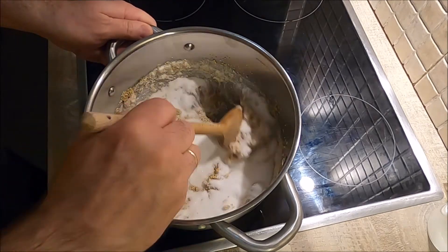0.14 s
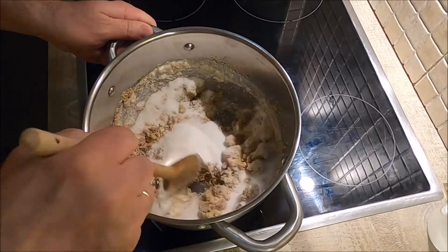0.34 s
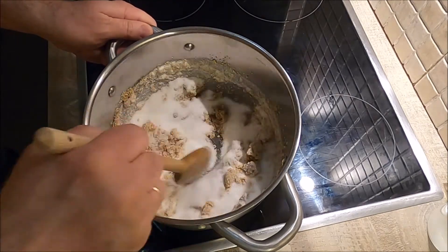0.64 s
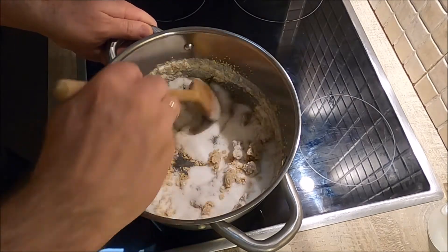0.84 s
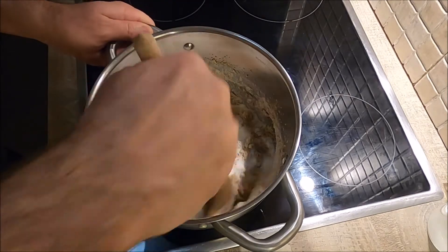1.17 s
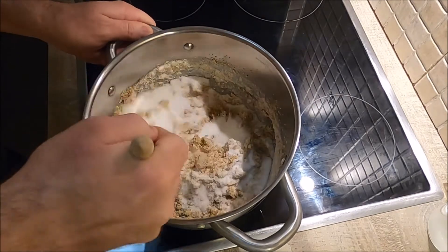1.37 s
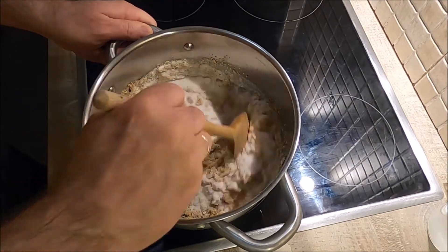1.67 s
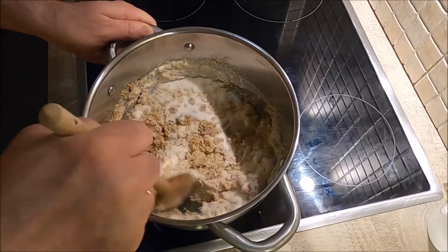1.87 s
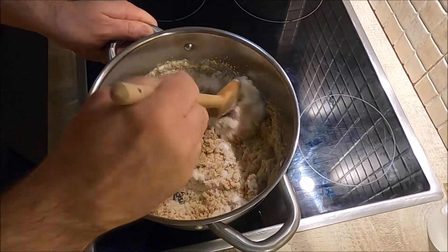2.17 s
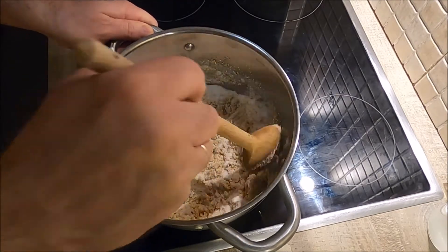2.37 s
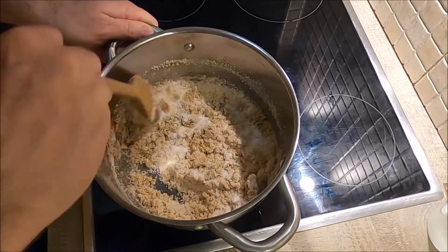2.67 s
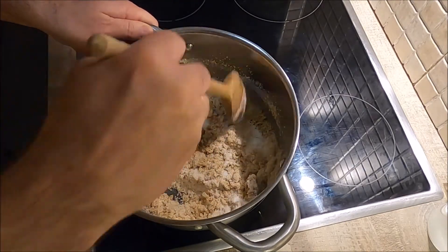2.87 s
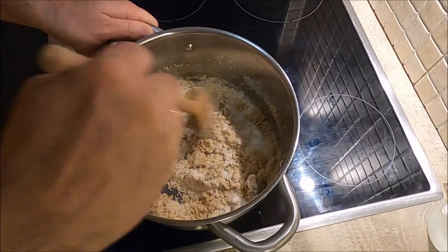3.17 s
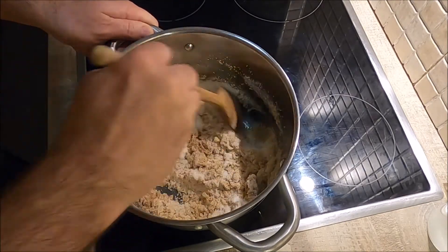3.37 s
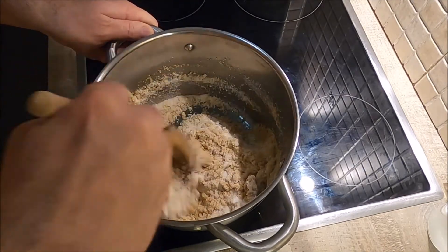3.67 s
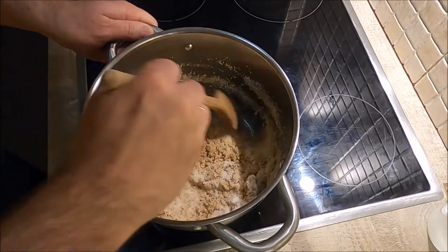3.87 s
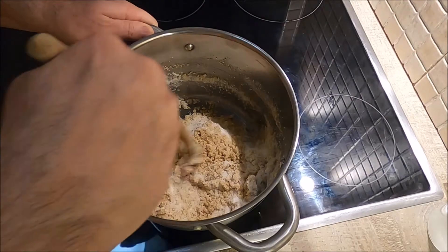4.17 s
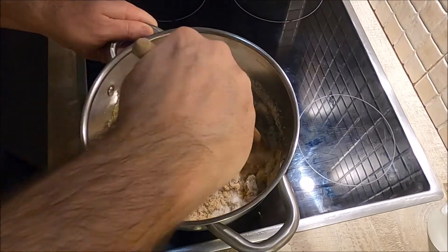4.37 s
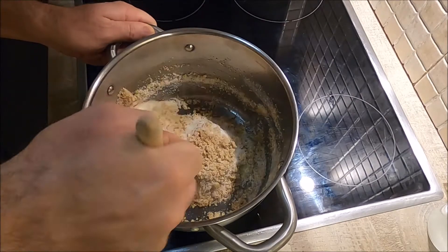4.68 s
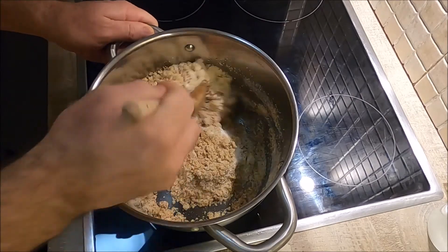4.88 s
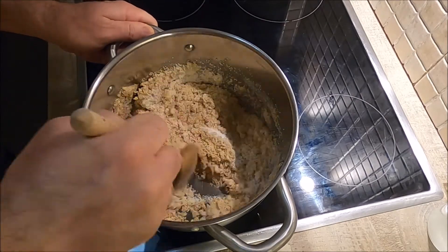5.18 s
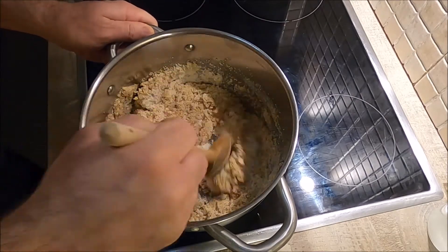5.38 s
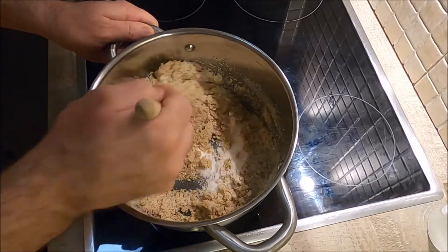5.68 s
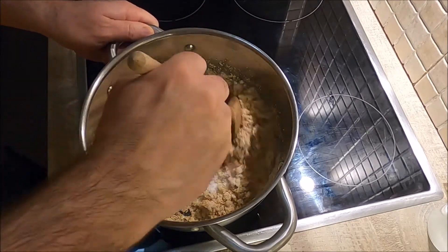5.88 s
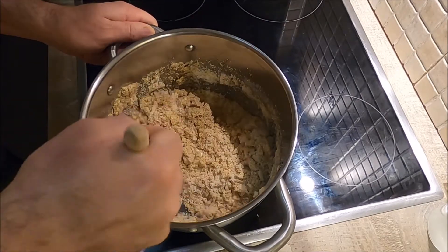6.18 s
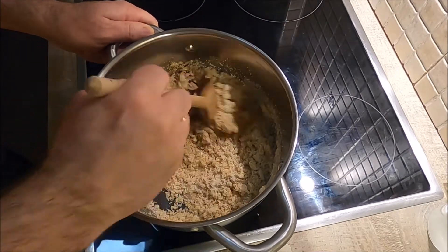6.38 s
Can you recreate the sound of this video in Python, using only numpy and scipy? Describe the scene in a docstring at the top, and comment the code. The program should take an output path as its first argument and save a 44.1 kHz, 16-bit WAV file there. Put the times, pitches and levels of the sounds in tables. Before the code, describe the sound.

Heard from just above a steel pot in a small, quiet kitchen, a wooden spoon stirs dry sugar and crumbs. From 0 to 1 s a grainy rasp with sandy hiss swells and eases over soft low bumps. At 1.0 s a crisp crunch and a double thud start a longer scrape to about 2.1 s, followed by a shorter push. A knock at 2.5 s leads to choppier strokes: bright crunches with short wood-on-steel clunks at 3.05 and 3.4 s, then more at 3.95 and 4.1 s. Around 4.5 s comes a sharp crunch and the deepest thump, the pot rocking on the glass hob. From there to 6.5 s scraping is nearly continuous, gritty and uneven, with lighter taps, small crunches and dull bumps, a last crisp tick near 6.46 s. Metal ringing is brief and damped; reflections are short, the sound leaning slightly left.

```python
"""Sugar grains hiss and rasp in sweeps that swell as the hand bears down and settle after each turn: a wooden
spoon stirs a dry, crumbly mix in a hand-held steel pot on a glass hob in a small kitchen. The scrape is
random clicks and coloured noise; crystals crunch on the steel as short band-passed bursts; the pot thuds and
rocks, its bottom, base and wall ringing as damped modes. Random reflections and a quiet noise floor surround it."""
import sys
import numpy as np
from scipy import signal
from scipy.fft import rfft, irfft, next_fast_len
from scipy.io import wavfile

SR = 44100
rng = np.random.default_rng(int(sys.argv[2]) if len(sys.argv) > 2 else 0)


def transcribe(u):
    """Save the signal u as a 16-bit wav file named by the first command-line argument.

    u: samples, shape (n,) or (channels, n), limited to [-1, 1]; the rate is SR.
    q: integer samples, one column per channel.
    """
    v = np.clip(np.atleast_2d(u).T, -1, 1)
    q = np.round(v * 32767).astype(np.int16)
    wavfile.write(sys.argv[1], SR, q)


N = 287973
TIME = np.arange(N) / SR


def from_db(db):
    """Decibels to gain."""
    return 10 ** (np.asarray(db) / 20)


def rms_one(x):
    """Scale to unit rms."""
    return x / np.sqrt(np.mean(x ** 2) + 1e-20)


def at_hz(points, hz):
    """Interpolate a table on a log-frequency axis."""
    f, value = np.transpose(points)
    return np.interp(np.log(np.maximum(hz, 1)), np.log(f), value)


def band(x, low_hz, high_hz):
    """Causal band-pass."""
    edges_hz = [low_hz, min(high_hz, SR / 2 - 500)]
    return signal.sosfilt(signal.butter(2, edges_hz, "band", fs=SR, output="sos"), x)


def coloured(x, spectrum):
    """Shape a noise by a spectrum; rms 1."""
    size = next_fast_len(N)
    gain = from_db(at_hz(spectrum, np.fft.rfftfreq(size, 1 / SR)))
    return rms_one(irfft(rfft(x, size) * gain, size)[..., :N])


def drift(rate_hz):
    """Slow random curve: normal values of spread 1, rate_hz a second, joined by lines."""
    return np.interp(TIME * rate_hz, np.arange(4000), rng.standard_normal(4000))


def add(track, s, sound):
    """Mix a sound into a track at a time."""
    start = int(np.clip(round(s * SR), 0, N - 1))
    track[start:start + len(sound)] += sound[:N - start]


def ring(push, hz, t60_s):
    """Two-pole resonator: a unit click starts a decaying sine of height 1."""
    r = from_db(-60 / (t60_s * SR))
    w = 2 * np.pi * hz / SR
    return signal.lfilter([0, np.sin(w)], [1, -2 * r * np.cos(w), r * r], push + 1e-18)


def grains(per_s, spread_db, size=N):
    """Random clicks of either sign, with exponentially distributed dB levels capped at 5 spreads."""
    born = rng.random(size) < per_s / SR
    sign = rng.choice([-1, 1], size)
    return born * sign * from_db(spread_db * np.minimum(rng.exponential(1, size), 5))


def struck(modes, times_s, levels_db, scatter_db):
    """Every blow excites each mode with a strength of its own; levels have one row a blow."""
    out = np.zeros(N)
    at = np.clip(np.round(times_s * SR).astype(int), 0, N - 1)
    strengths_db = levels_db + scatter_db * rng.standard_normal((len(at), len(modes)))
    for k, (hz, db, t60_s) in enumerate(modes):
        pushes = np.zeros(N)
        pushes[at] = (-1) ** k * from_db(db + strengths_db[:, k])
        out += ring(pushes, hz, t60_s)
    return out


def favour(hz, spot_hz, db_per_octave):
    """Gain in dB, falling with distance from the pitch that a spot favours."""
    return -db_per_octave * np.abs(np.log2(hz / spot_hz))


# quiet-kitchen noise spectrum: f/Hz, relative level/dB
QUIET_SPECTRUM = [(25, -7), (90, 1), (200, 4), (400, -6), (900, -11.5), (2000, -38), (5000, -31),
                  (9000, -42), (16000, -44.5)]


def quiet_kitchen():
    """Steady noise, mostly independent at the two microphones."""
    shared = rng.standard_normal(N)
    separate = rng.standard_normal((2, N))
    return from_db(-66.5) * coloured(shared + 2.8 * separate, QUIET_SPECTRUM)


KITCHEN_T60_S, KITCHEN_TREBLE_T60_S = 0.28, 0.054
# likeness of reflected sound at the two microphones: f/Hz, likeness/0-1
LIKENESS = [(100, 1), (400, 0.42), (1000, 0.07), (2500, 0.11), (5000, 0.14), (15000, 1)]


def reflections(pot_db, pot_t60_s, room_db):
    """Stereo response: flutter inside the pot and off the hob, then a kitchen tail that loses its treble first."""
    t = TIME[:2 ** 14]
    alike = np.clip(at_hz(LIKENESS, np.fft.rfftfreq(len(t), 1 / SR)), 0, 1)
    mid, side = rfft(rng.standard_normal((2, len(t)))) / np.sqrt(SR)
    pair = irfft(np.sqrt((1 + alike) / 2) * mid + np.sqrt((1 - alike) / 2) * side * [[1], [-1]])
    dull = signal.lfilter(*signal.butter(1, 6000, fs=SR), pair)

    def dying(t60_s):
        """Exponential fall of unit energy."""
        return np.sqrt(2 * np.log(1000) / t60_s) * np.exp(-np.log(1000) * t / t60_s)

    tail = dull * dying(KITCHEN_T60_S) + (pair - dull) * dying(KITCHEN_TREBLE_T60_S)
    onset = np.minimum(t / 0.0016, 1)
    return (from_db(pot_db) * pair * dying(pot_t60_s) + from_db(room_db) * tail) * onset


LEFT_LAG_SAMPLES, TURNS_PER_S = 2, 1.5


def placed(x, left_db, pot_db, pot_t60_s, room_db, count):
    """Sound arrives later and louder at the left; reflections crossfade as the spoon passes count spots a turn."""
    out = np.array([np.pad(x, (LEFT_LAG_SAMPLES, 0))[:N], x])
    spot = TIME * TURNS_PER_S * count
    for k in range(count):
        share = np.interp(spot, np.arange(count), np.arange(count) == k, period=count)
        response = reflections(pot_db, pot_t60_s, room_db)
        out = out + signal.oaconvolve((x * np.sqrt(share))[None], response, axes=1)[:, :N]
    return out * from_db([[left_db / 2], [-left_db / 2]])


ROCKING_HZ = 91.8
# blows that move the pot: t/s, then relative level/dB of rocking, bottom, clap
KNOCKS = [(.021, -47, -45.5, -82), (.184, -38, -48.5, -56), (.359, -52, -57, -73),
          (.619, -41.5, -50.5, -79), (1.009, -40, -35.5, -66), (1.044, -43.5, -35, -67),
          (1.119, -44.5, -41, -80), (1.179, -42, -48, -72), (1.362, -37.5, -40.5, -54),
          (1.612, -41.5, -48, -75), (1.666, -42, -37.5, -53), (2.082, -45, -36.5, -50),
          (2.231, -41, -41, -63), (2.515, -53, -31, -44.5), (2.539, -53, -28.5, -57),
          (2.568, -72, -36.5, -75), (2.675, -80, -50.5, -74), (2.739, -88, -56.5, -78),
          (3.051, -45.5, -24, -48), (3.074, -62, -37, -55.5), (3.099, -67, -37, -62),
          (3.403, -58, -25, -42), (3.447, -46, -33.5, -46), (3.649, -59, -74, -72),
          (3.707, -47.5, -70, -77), (3.951, -37, -33.5, -63), (3.993, -30, -31, -49.5),
          (4.077, -37, -46, -56), (4.458, -43.5, -30.5, -55.5), (4.511, -23.5, -27.5, -42),
          (4.623, -35, -68, -64.5), (4.748, -38, -57, -60), (5.039, -41, -41, -52.5),
          (5.066, -34.5, -40.5, -75), (5.177, -43.5, -39.5, -53), (5.37, -55.5, -74, -82),
          (5.448, -44.5, -73, -83), (5.812, -48.5, -43, -49.5), (5.89, -35, -65, -67),
          (6.057, -50, -52.5, -70), (6.2, -41, -47.5, -55.5), (6.463, -37.5, -43, -59.5)]


def rocking(rise_s, t60_s):
    """Each blow sets the whole pot bouncing on the hob: a decaying low sine with a soft start."""
    out, t = np.zeros(N), TIME[:SR // 2]
    envelope = (1 - np.exp(-t / rise_s)) * np.exp(-np.log(1000) * t / t60_s)
    bounce = envelope * np.sin(2 * np.pi * ROCKING_HZ * t)
    for s, db, _, _ in KNOCKS:
        add(out, s, from_db(db + 14.5) * bounce)
    return out


# modes of the loaded bottom and the hob under it: f/Hz, relative level/dB, t60/s
BOTTOM_MODES = [(122.3, -7, 0.28), (142.9, -3.5, 0.3), (185, 5.5, 0.075), (191, 2, 0.13), (219, -3.5, 0.15),
                (268.6, -6, 0.1), (286.2, -4.5, 0.07)]


def bottom_thuds():
    """Blows ring the loaded bottom and the hob under it."""
    knock_s, _, bottom_db, _ = np.transpose(KNOCKS)
    return band(struck(BOTTOM_MODES, knock_s, bottom_db[:, None] - 0.5, scatter_db=3.5), 76, 600)


# modes of the pot's base clapping on the glass: f/Hz, relative level/dB, t60/s
CLAP_MODES = [(348.7, 4.5, 0.12), (387, 0, 0.052), (426.3, 0.5, 0.14), (468.4, -2, 0.16), (516, -1.5, 0.11),
              (571.6, -2.5, 0.099), (614.3, -4.5, 0.092), (679, -6.5, 0.16), (714, -9.5, 0.12),
              (832, -12, 0.097)]


def base_claps():
    """Blows clap the pot's base on the glass and ring its modes."""
    knock_s, _, _, clap_db = np.transpose(KNOCKS)
    return band(struck(CLAP_MODES, knock_s, clap_db[:, None] + 2.5, scatter_db=3.5), 190, 1700)


SWEEP_ATTACK_S, SETTLE_DB_PER_S = 0.0053, 284


def sweeping(start_s, end_s):
    """Envelope of a sweep: quick start, hold, then the grains settle."""
    attack = np.clip((TIME - start_s) / SWEEP_ATTACK_S, 0, 1)
    return attack * from_db(-SETTLE_DB_PER_S * np.maximum(TIME - end_s, 0))


JUDDER_DB, JUDDER_DB_PER_S = -6.5, 122   # start relative to the KNOCKS rocking level; rate of fall
# the spoon ploughs through the mix: start t/s, end t/s, relative start level/dB, relative end level/dB,
# loose sugar/dB (more hiss, less rasp), relative drag level on the pot/dB
SWEEPS = [(0, 0.707, -53.5, -58.5, 0, -59), (.7, 1, -67, -58.5, 1, -72), (1.04, 2.07, -52, -54, 0, -55.5),
          (2.085, 2.328, -62, -54.5, 3, -54), (2.532, 2.823, -62.5, -57, 4, -72),
          (3.037, 3.224, -56.5, -56.5, -1, -72), (3.44, 3.755, -49, -59, 1.5, -56),
          (3.76, 3.938, -66, -64, -2.5, -68), (3.95, 4.183, -54.5, -52.5, -1, -56),
          (4.466, 5.195, -55, -53, 0.5, -64), (5.22, 5.742, -57, -58, -1, -79),
          (5.766, 6.53, -54, -50.5, 0, -55.5)]


def dragging():
    """Friction slips drive the pot's low modes during sweeps; the pot judders on after every blow."""
    power = sum((sweeping(start_s, end_s) * from_db(drag_db)) ** 2
                for start_s, end_s, _, _, _, drag_db in SWEEPS)
    judder_fall_db = JUDDER_DB_PER_S * TIME[:SR // 2]
    for s, rocking_db, _, _ in KNOCKS:
        add(power, s, from_db(rocking_db + JUDDER_DB - judder_fall_db) ** 2)
    slips = grains(830, spread_db=3.5)
    modes = [(ROCKING_HZ, 11, 0.11)] + BOTTOM_MODES
    hum = sum((-1) ** k * from_db(db) * ring(slips, hz, t60_s) for k, (hz, db, t60_s) in enumerate(modes))
    return np.sqrt(power) * rms_one(hum)


# modes of the hand-damped wall: f/Hz, relative level/dB, t60/s
WALL_MODES = [(598, -4, .1), (760, -3, .13), (992, 0, .15), (1012, -4, .19), (1170, -8, .13),
              (1335, -7, .17), (1497, -4, .18), (1658, -5, .12), (1870, -4, .1), (1990, -5, .1),
              (2085, 0, .17), (2379, -5, .1)]
# bare spoon on the steel wall: t/s, relative level/dB, favoured f/Hz
TAPS = [(1.008, -46.5, 1870), (2.238, -50.5, 1930), (2.515, -41.5, 695), (2.678, -54, 1160),
        (3.051, -35.5, 1043), (3.075, -58, 2000), (3.403, -41.5, 970), (4.076, -44.5, 1500),
        (4.103, -44.5, 1380), (4.458, -47.5, 2110), (5.036, -48.5, 2400), (6.461, -45, 1430)]


def wall_rings():
    """Taps ring the hand-damped wall, most in the modes near the spot's pitch."""
    tap_s, tap_db, spot_hz = np.transpose(TAPS)
    answer_db = favour(np.array(WALL_MODES)[:, 0], spot_hz[:, None], db_per_octave=7.5)
    return struck(WALL_MODES, tap_s, tap_db[:, None] + 0.5 + answer_db, scatter_db=3.2)


def wood_clunks(level_db, fall_s, width):
    """The damped wooden spoon answers each tap with a short, broad clunk around the spot's pitch."""
    out, t = np.zeros(N), TIME[:SR // 8]
    for s, db, hz in TAPS:
        rattle = rng.standard_normal(len(t)) * np.exp(-t / fall_s)
        sound = band(rattle, hz / (1 + width), hz * (1 + width))
        add(out, s, from_db(db + level_db) * sound / np.abs(sound).max())
    return out


# crunch bands: low f/Hz, high f/Hz
CRUNCH_BANDS = [(900, 2200), (2200, 3800), (3800, 6300), (6300, 8600)]
# spoon crushing crystals on steel: t/s, burst fall time/s, level/dB, favoured f/Hz, loss away from it/(dB/octave)
CRUNCHES = [(0.18, .0018, -42, 5600, 5), (0.621, 0.0018, -47, 1900, 5), (1.0058, 0.0025, -26.5, 3900, 6.5),
            (1.2965, 0.00075, -47, 4500, 1), (1.342, 0.006, -45, 7000, 5),
            (1.3815, 0.0039, -45.5, 4970, 3.5), (1.6086, 0.0026, -37, 1700, 12.5),
            (1.668, 0.0023, -39.5, 6500, 11), (2.0798, 0.0059, -36.5, 5130, 6),
            (2.225, 0.0028, -39, 4600, 2.5), (2.237, 0.00097, -40, 1680, 2.5),
            (2.5164, 0.00062, -36, 3200, 2.5), (2.662, .0031, -44, 5460, 7),
            (2.6766, 0.0019, -37.5, 5800, 11.5), (3.049, 0.0019, -23, 5560, 12),
            (3.073, 0.014, -33, 4360, 11), (3.4024, 0.00062, -25.5, 7440, 3),
            (3.9471, 0.003, -27, 5500, 6.5), (3.986, .012, -43, 3500, 0), (4.075, 0.0017, -30, 1800, 5),
            (4.433, 0.0067, -49.5, 8000, 11), (4.4596, 0.003, -25.5, 5250, 20.5),
            (4.512, 0.0044, -39.5, 5460, 3.5), (4.7082, 0.0052, -37.5, 4800, 6.5),
            (5.0365, 0.0042, -34, 7100, 9.5), (5.8086, 0.0018, -39.5, 3480, 7),
            (5.9042, 0.0018, -42, 6000, 14), (6.011, .0014, -48.5, 1400, 15),
            (6.186, .0073, -37, 3300, 8.5), (6.4599, 0.00053, -31.5, 5930, 3)]


def crunches(rise_share, grit_db, grit_s, load_db, load_s, sparkle_db, sparkle_top_db):
    """Crystals creak under load, burst within milliseconds, then grind on; the spot colours each burst."""
    out, lead_s = np.zeros(N), .02
    t = TIME[:SR // 8] - lead_s
    before = t < 0
    times_s, falls_s, peak_db, spot_hz, loss = np.transpose(CRUNCHES)
    levels_db = [peak_db + favour(np.sqrt(low * high), spot_hz, loss) for low, high in CRUNCH_BANDS]
    # the finest splinters can only get so loud
    finest_db = np.minimum(levels_db[-1] + sparkle_db, sparkle_top_db)
    burst = np.exp(-np.abs(t) / (falls_s[:, None] * np.where(before, rise_share, 1)))
    grinding = from_db(np.where(before, load_db, grit_db)) * np.exp(-np.abs(t) / np.where(before, load_s, grit_s))
    for (low, high), band_db in zip(CRUNCH_BANDS + [(8500, 12100)], levels_db + [finest_db]):
        cracks = rng.standard_normal(burst.shape) * (burst + grinding)
        sounds = band(band(cracks, low, high), low * 0.65, high * 1.63)
        for s, db, sound in zip(times_s, band_db, sounds):
            rms = np.sqrt(np.sum(sound ** 2) / (0.0074 * SR))   # energy spread over 7.4 ms
            add(out, s - lead_s, from_db(db) * sound / rms)
    return out


def wandering(x, depth_db, rate_hz):
    """Each third of an octave swells and fades on its own as the heap shifts around the spoon."""
    size = next_fast_len(N)
    spectrum, hz = rfft(x, size), np.fft.rfftfreq(size, 1 / SR)
    out = np.zeros(N)
    centres_hz = np.geomspace(900, 9000, 10)
    for centre_hz in centres_hz:
        weight = np.interp(hz, centres_hz, centres_hz == centre_hz)
        part = irfft(spectrum * weight, size)[:N]
        out += part * from_db(depth_db * drift(rate_hz))
    return out


def crumbs(per_s, t60_s):
    """Larger crumbs snap one by one, each at one of ten pitches; rms 1."""
    pitches_hz = np.geomspace(1200, 8000, 10)
    snaps = [grains(per_s / len(pitches_hz), spread_db=0.8) for _ in pitches_hz]
    return rms_one(sum(ring(clicks, hz, t60_s) for clicks, hz in zip(snaps, pitches_hz)))


TRICKLE_DB = -77.5   # faint flow between sweeps, relative like SWEEPS
# the hand bears down: t/s, half length/s, relative level/dB, favoured f/Hz
PUSHES = [(0.161, .04, -46, 2900), (0.278, .04, -54, 7000), (.385, 0.038, -50.5, 1410),
          (0.533, 0.1, -49.5, 2000), (0.82, 0.039, -46.5, 1600), (0.893, 0.031, -56.5, 2960),
          (1.17, 0.041, -43, 3500), (1.354, .03, -46.5, 4500), (1.593, 0.087, -46.5, 1940),
          (2.194, 0.065, -41.5, 2550), (2.337, .02, -54.5, 4800), (2.609, .03, -45.5, 4400),
          (2.753, 0.033, -51, 3540), (2.817, 0.032, -50.5, 1490), (2.927, 0.019, -64, 8000),
          (3.195, 0.015, -50, 1800), (3.352, 0.14, -54, 1250), (3.497, 0.043, -47.5, 3500),
          (3.815, 0.03, -49.5, 1250), (4.092, .045, -46.5, 2170), (4.705, 0.031, -49, 3830),
          (4.964, .03, -56, 1500), (5.358, 0.028, -49.5, 1790), (5.662, 0.045, -54, 4970),
          (5.825, 0.063, -45, 2470), (5.923, 0.032, -46.5, 2560), (6.176, .045, -41, 2590),
          (6.414, .04, -44, 2300), (6.502, 0.024, -45, 5390)]


def effort_db(hz, sugar_share, sweep_db):
    """Scrape level around hz: sweeps sloping evenly in dB, plus a bell-shaped swell for every push."""
    power = from_db(TRICKLE_DB) ** 2
    for start_s, end_s, start_db, end_db, sugar_db, _ in SWEEPS:
        slope_db = np.interp(TIME, [start_s, end_s], [start_db, end_db])
        db = slope_db + sugar_share * sugar_db + sweep_db
        power = power + (sweeping(start_s, end_s) * from_db(db)) ** 2
    for s, half_s, db, spot_hz in PUSHES:
        near = np.abs(TIME - s) < 4 * half_s
        bell = np.exp(-((TIME[near] - s) / half_s) ** 2)
        power[near] += from_db(db + favour(hz, spot_hz, db_per_octave=9.5)) ** 2 * bell
    return 10 * np.log10(power)


RASP_HZ, RUB_HZ, HISS_HZ = 1600, 3440, 6500   # nominal centres
SNAP_DB = -14   # relative to the mean of rasp and rub effort
# scrape spectra: f/Hz, relative level/dB
RASP_SPECTRUM = [(250, -13), (500, -2.5), (850, -14.5), (1250, 0), (1950, -4), (2600, -5.5), (3600, -31),
                 (7000, -42.5), (15000, -58)]
RUB_SPECTRUM = [(900, -40), (1900, 0.5), (2700, -3.5), (3800, 1.5), (4700, -1), (6000, -14), (8000, -12),
                (15000, -34)]
HISS_SPECTRUM = [(2500, -19.5), (4500, -2), (6000, -1.5), (7800, -0.5), (9500, -8), (12000, -11),
                 (14000, -19.5), (15500, -52)]


def stirring():
    """Crumbs rasp and rub in uneven slips and loose sugar slides; a faster flow has more grains."""
    rasp_db = effort_db(RASP_HZ, sugar_share=-1.9, sweep_db=0.1)
    rub_db = effort_db(RUB_HZ, sugar_share=0, sweep_db=-1.5)
    hiss_db = effort_db(HISS_HZ, sugar_share=1, sweep_db=-2.46)
    slips = drift(110)
    rasp = coloured(grains(4000, spread_db=3.0) * from_db(1.8 * slips), RASP_SPECTRUM)
    rub = coloured(grains(8000, spread_db=3.0) * from_db(0.67 * slips), RUB_SPECTRUM)
    flow = from_db(.5 * (hiss_db - hiss_db.max()))
    sliding = grains(24000 * flow, spread_db=-1.0) / np.sqrt(flow)   # denser flow, same mean power
    hiss = coloured(sliding * from_db(1.0 * slips), HISS_SPECTRUM)
    mix = rasp * from_db(rasp_db - 4.5) + rub * from_db(rub_db - 2.0) + hiss * from_db(hiss_db)
    snaps = crumbs(per_s=91, t60_s=0.007) * from_db((rasp_db + rub_db) / 2 + SNAP_DB)
    return wandering(mix, depth_db=3.0, rate_hz=22) + snaps


def scene():
    """The pot just under the microphones, in a quiet kitchen."""
    sway = rocking(rise_s=0.0067, t60_s=0.15) + dragging()
    bottom = bottom_thuds()
    clap = base_claps()
    wall = wall_rings()
    wood = wood_clunks(level_db=10.5, fall_s=0.0064, width=0.22)
    crunch = crunches(rise_share=0.15, grit_db=-29.0, grit_s=0.032, load_db=-29, load_s=0.0063,
                      sparkle_db=-10.5, sparkle_top_db=-46)
    return (quiet_kitchen()
            + sway * from_db([[1.2], [-1.2]])   # long waves: same waveform at both microphones
            + placed(bottom, left_db=1.5, pot_db=-23.0, pot_t60_s=0.18, room_db=-6.0, count=3)
            + placed(clap + wall + wood, left_db=1.8, pot_db=-16.5, pot_t60_s=0.048, room_db=-1.5, count=3)
            + placed(crunch, left_db=3.0, pot_db=-9.5, pot_t60_s=0.0093, room_db=-4.5, count=4)
            + placed(stirring(), left_db=2.5, pot_db=-7.5, pot_t60_s=0.022, room_db=-6.5, count=6))


CUTOFF_HZ = 15400


def record(dry):
    """The left microphone is duller at the very top; both are cut steeply."""
    left = signal.filtfilt(*signal.butter(2, 11000, fs=SR), dry[0])
    return signal.sosfilt(signal.ellip(10, .1, 80, CUTOFF_HZ, fs=SR, output="sos"), [left, dry[1]])


dry = scene()
out = record(dry)
transcribe(out)
```